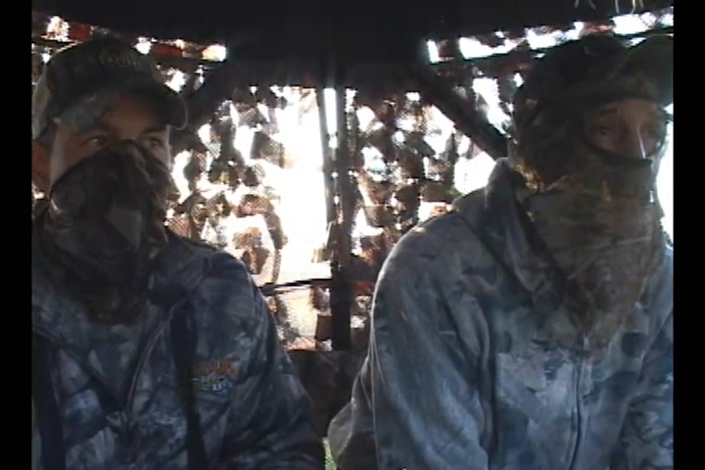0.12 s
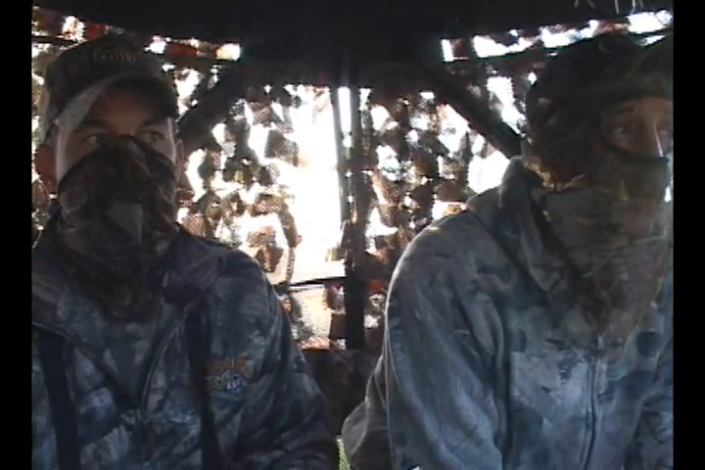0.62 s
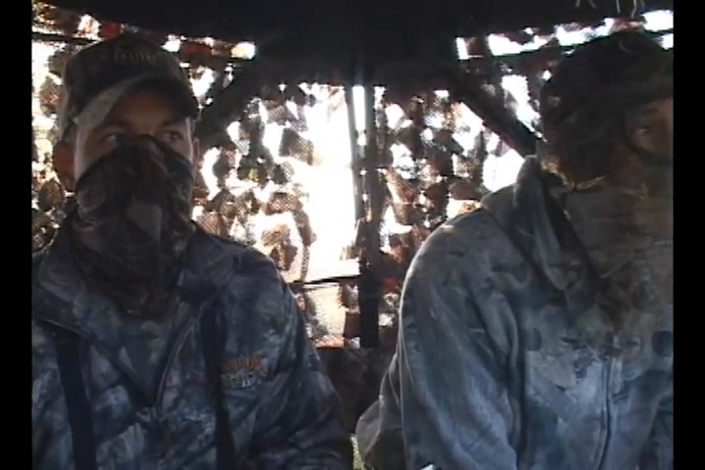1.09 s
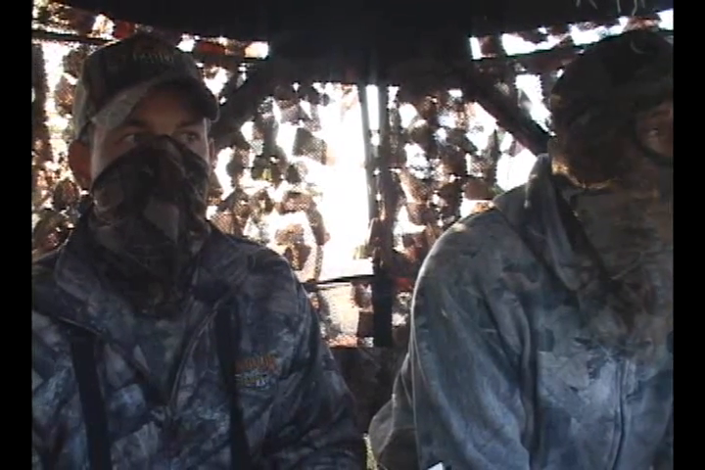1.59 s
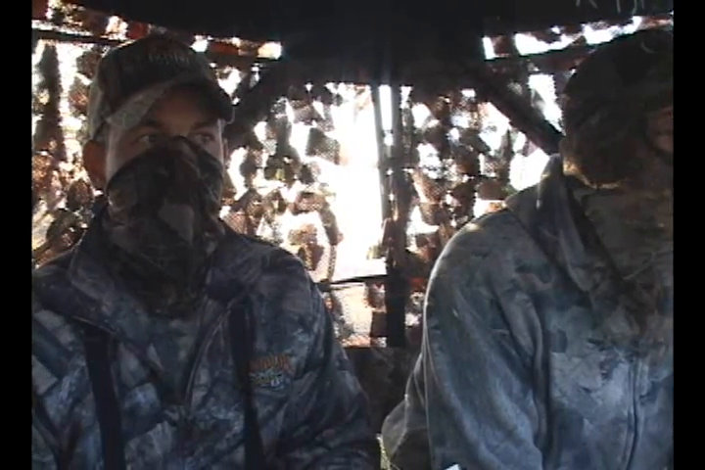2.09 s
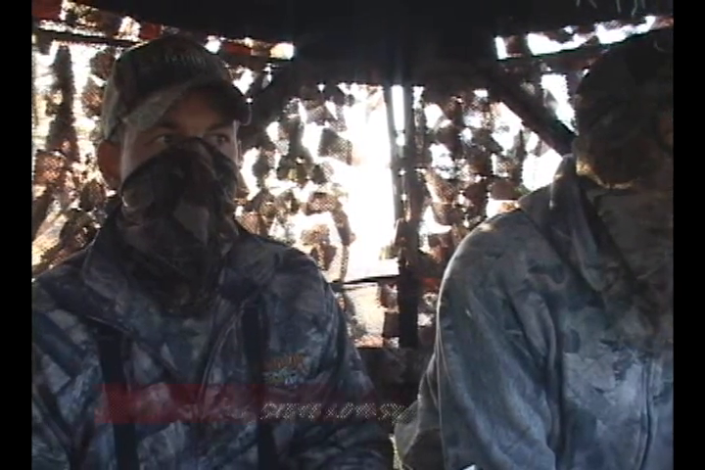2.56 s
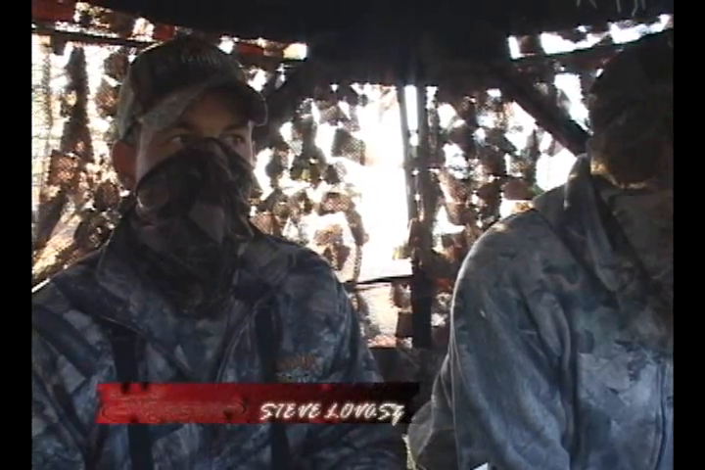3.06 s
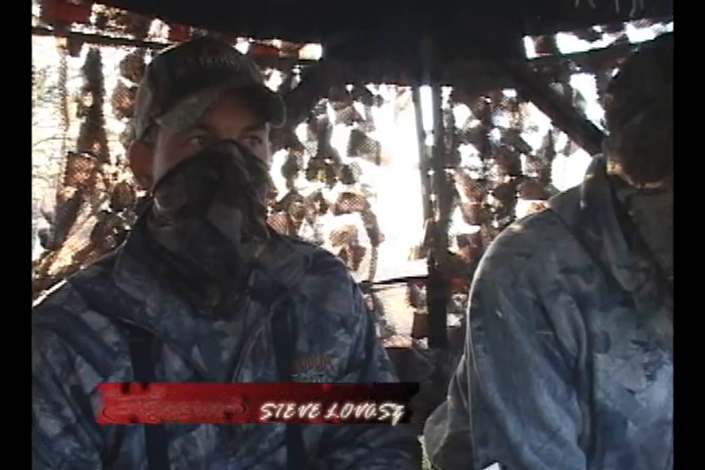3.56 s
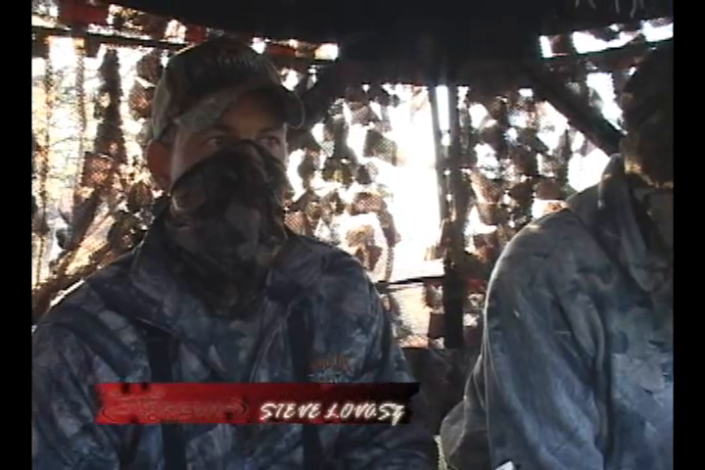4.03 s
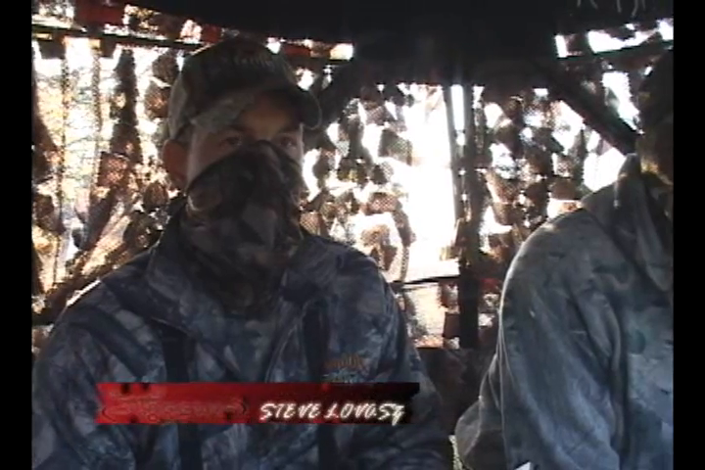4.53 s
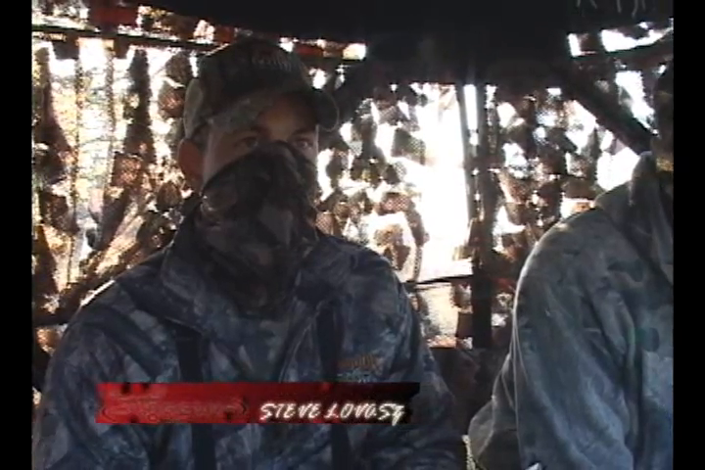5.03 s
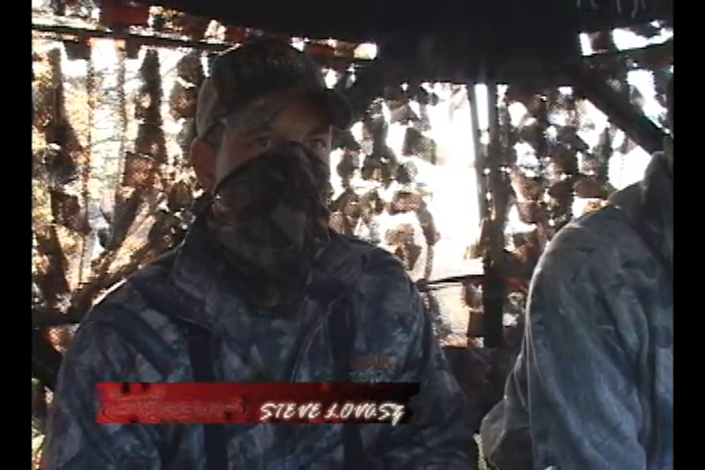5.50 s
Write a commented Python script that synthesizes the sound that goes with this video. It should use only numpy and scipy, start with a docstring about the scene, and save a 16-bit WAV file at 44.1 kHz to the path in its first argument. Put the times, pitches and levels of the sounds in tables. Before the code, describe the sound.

Low wind rumble and soft hiss open the scene, heard by a close microphone in a small, nearly echo-free cloth hide. At 0.1 seconds a wooden box call gives a loud, raspy, nasal yelp about 0.15 seconds long; the second comes at 0.56, and nine more follow roughly every 0.4 seconds, ending at 4.3. Each yelp bites quickly, sags in pitch, then flicks upward as it stops, with a faint gritty squeak. Between strokes the chalked lid slides back with a light, rounded scrape, and dull low thumps come from hand jolts. The eighth yelp drops out for an instant near 3.05. Small birds whistle faintly at 1.3 and between 2.1 and 2.6. From 4.3 held high notes, sliding whistles and faint pips emerge, then a rapid run of short chirps from 5.0. A tiny dry tick comes near 5.08, and a high buzzing trill begins around 5.5.

```python
"""A wooden box call is stroked eleven times in a small hide: its chalked lid sticks and slips on the rim.
Each slip is a pulse that rings the box as a yelp; the lid settles with a squeak, and between strokes
it drags back as filtered noise. Low sine thumps are the hand jolting the microphone.
Songbirds are sliding whistles and a trill, over wind rumble and hiss made of coloured noise; a tick clicks.
The sound drops out for an instant in the eighth yelp."""
import sys
import numpy as np
from scipy import signal
from scipy.io import wavfile
from scipy.ndimage import uniform_filter1d

SR = 44100
rng = np.random.default_rng(int(sys.argv[2]) if len(sys.argv) > 2 else 0)


def volts_from_decibels(level):
    """Turn decibel levels (scalar or array-like) into linear amplitude factors."""
    exponent = np.asarray(level, float) / 20
    return 10 ** exponent


def persist_wave(psi):
    """Save psi, clipped to +-1, as 16-bit WAV."""
    counts = np.round(np.clip(psi, -1, 1) * 32767).astype(np.int16)
    wavfile.write(sys.argv[1], SR, np.atleast_2d(counts).T)


N = 248283  # length in samples


def evened(x):
    """Scales a sound to an rms (average strength) of 1."""
    return x / np.sqrt(np.mean(x ** 2) + 1e-20)


def read(points, hz):
    """Reads a spectrum table on a log-frequency axis, close to how we hear pitch."""
    f, value = np.transpose(points)
    return np.interp(np.log(hz + 1), np.log(f + 1), value)


def add(mix, start, sound):
    """Mixes a sound in at start seconds."""
    part = mix[round(start * SR):][:len(sound)]
    part += sound[:len(part)]


def wander(size, span):
    """Smooth random drift of rms 1: noise averaged twice over span samples."""
    once = uniform_filter1d(rng.standard_normal(size), round(span))
    return evened(uniform_filter1d(once, round(span)))


def coloured(points, patchy_db):
    """Noise with a given spectrum, whose strength drifts in patches of time and pitch."""
    frames, hz = N // 512 + 5, np.fft.rfftfreq(2048, 1 / SR)
    real, imaginary, patches = rng.standard_normal((frames, 1025, 3)).T
    patches = evened(uniform_filter1d(uniform_filter1d(patches, 8, 0), 5, 1))
    level_db = read(points, hz)[:, None] + patchy_db * patches
    spectrum = (real + 1j * imaginary) * volts_from_decibels(level_db)
    return evened(signal.istft(spectrum, nperseg=2048, noverlap=1536)[1][:N])


# colour of the air hiss: f/Hz, relative level/dB
AIR = [(150, -39.5), (250, -7.5), (330, -10), (354, -12), (500, -6), (1420, -16), (2340, -27),
       (2510, -22.5), (4380, -27.5), (5390, -34), (15800, -38.5)]
# colour of the wind rumble: f/Hz, relative level/dB
RUMBLE = [(12, -62.5), (20, -29), (50, 0), (75, -5), (109, -2), (134, -10), (239, -17), (400, -32.5),
          (520, -60.5), (880, -120)]
# swell of the rumble: t/s, level/dB
GUSTS = [(0.0, -43), (1.6, -46), (1.68, -40.5), (1.83, -51.5), (2.13, -45.5), (2.6, -48), (4.86, -51.5),
         (5.38, -47.5), (5.63, -54)]
# thin wavering whistles in the hiss: f/Hz, width/Hz, level/dB
FAINT_TONES = [(1497, 40, -79), (6444, 20, -91), (8689, 20, -92)]


def outdoors():
    """Lumpy wind rumble over a smoother hiss, with a few faint tones that waver in strength."""
    t = np.arange(N) / SR
    tones = np.zeros(N)
    for hz, width, db in FAINT_TONES:
        waver = 0.92 + .6 * wander(N, SR / width / 2)
        tones += volts_from_decibels(db) * waver * np.sqrt(2) * np.sin(2 * np.pi * hz * t)
    gust_db = np.interp(t, *np.transpose(GUSTS))
    rumble = volts_from_decibels(gust_db) * coloured(RUMBLE, patchy_db=2.0)
    hiss = volts_from_decibels(-57) * coloured(AIR, patchy_db=1.0)
    return rumble + hiss + tones


# broad colour of the box: f/Hz, relative level/dB
BOX = [(300, -52), (700, -21.5), (1000, -16), (1500, -4.5), (2200, -16), (3200, -20.5), (4600, -33.5),
       (7400, -32.5), (10400, -43.5), (15500, -54)]
# its resonances and dead spots: f/Hz, width/Hz, level above the broad colour/dB
BOX_MODES = [(1341.4, 166, 10), (1662, 21, 1), (1678, 320, 11), (2225, 170, 8), (2420, 150, -0.5),
             (2678, 266, 9.5), (2770, 56, -12.5), (2900, 270, 5), (3400, 63, 10.5), (3584, 200, -9),
             (3853, 403, 22), (4106, 170, 7), (4486, 323, -8.5), (4620, 496, 10.5), (5480, 140, 13.5),
             (6000, 250, 7.5), (6367, 344, 12), (6900, 300, -2.5), (7670, 100, 2.5), (8530, 410, 6.5),
             (9110, 330, 8), (11800, 500, 2.5), (11380, 230, 5)]


def box_ring(extra=((1, 0), (2, 0)), depth=1):
    """How the box rings after one tap: broad colour times resonances, with no sound before the tap."""
    hz = abs(np.fft.fftfreq(8192, 1 / SR))
    modes_db = sum(d / (1 + (2 * (hz - f) / w) ** 2) for f, w, d in BOX_MODES)
    db = read(BOX, hz) + read(extra, hz) + depth * modes_db
    # the Hilbert transform gives the minimum phase that belongs to these levels
    spectrum = np.exp(np.conj(signal.hilbert(np.log(volts_from_decibels(db)))))
    return np.fft.ifft(spectrum).real[:2048]


def stroke(start, end, bite_ms, lift_db, chalk_db, rates):
    """Hand motion of one stroke, as rows of t/s, level/dB, slips f/Hz, sharpness/dB, grit/dB."""
    s = np.linspace(start, end, 80)
    since, left, bite = s - start, end - s, bite_ms / 1000
    # loudness climbs from far below until the lid bites, then pressure eases for a moment
    loud_db = -16.5 - 29.5 * np.clip(1 - since / bite, 0, 1) ** 2
    loud_db -= np.exp(-((since - bite - .008) / 0.012) ** 2)
    # it drops as the lid lifts, and dies off at the very end
    loud_db -= 14 * np.clip(1 - left / 0.023, 0, 1) ** 1.35
    loud_db -= 11.5 * np.exp(-left / 0.0029)
    # a last upward flick of speed as the lid lets go
    hz = np.interp(s, *np.transpose(rates)) + 120 * np.exp(-left / .005)
    # slips start dull and sharpen as pressure builds
    sharp_db = lift_db - 18 * np.exp(-since / 0.024)
    # grit takes over as the lid lifts; a lid slower than 666 slips a second stumbles and grates
    rasp_top_db = -3
    grit_db = chalk_db + (rasp_top_db - chalk_db) * np.exp(-left / .016)
    grit_db += 0.33 * np.maximum(666 - hz, 0)
    return np.transpose([s, loud_db, hz, sharp_db, grit_db])


# extra colour of the chalk grit: f/Hz, level/dB
CHALK = [(500, 0), (1400, -10), (3000, 0), (6000, 10), (12000, 18)]


def yelp(rows):
    """Stick-slip pulses ring the box; grit adds a puff of noise to each slip and makes its timing uneven."""
    ring, chalk = box_ring(), box_ring(CHALK)
    s, loud_db, *columns = np.transpose(rows)
    t = np.arange(s[0], s[-1], 1 / SR)
    hz, sharp_db, grit_db = (uniform_filter1d(np.interp(t, s, c), 100, mode="nearest") for c in columns)
    uneven = np.minimum(.004 + .1 * volts_from_decibels(grit_db), .018)
    turns = np.cumsum(hz * (1 + uneven * wander(len(t), 30))) / SR  # slips counted so far
    slips = np.zeros(len(t))
    for k in range(1, 27):  # overtones of the slip rate
        treble = np.clip((k * hz - 1750) / 1800, 0, 1) + 0.56 * np.clip((k * hz - 8500) / 5000, 0, 1)
        treble += 0.35 * (k == 1)  # dull slips also lack the lowest tone
        # the contact point moves, so overtones come and go
        shape_db = treble * sharp_db + (1.47 + 2.5 * treble) * wander(len(t), 500)
        # high overtones leave from different parts of the box, out of step
        lag = rng.random() * min(k / 8, 1)
        slips += volts_from_decibels(shape_db) * np.cos(2 * np.pi * (k * turns + lag)) * (k * hz < 16500)
    puffs = .3 + np.exp(-(turns % 1) / .3)
    grit = puffs * rng.standard_normal(len(t)) * volts_from_decibels(grit_db + 3 + .5 * sharp_db)
    sound = evened(signal.fftconvolve(slips, ring)[:len(t)])
    sound += signal.fftconvolve(grit, chalk)[:len(t)] / np.linalg.norm(chalk)
    # strength is evened out, then follows the loudness rows, not the resonances
    steady = sound / np.sqrt(uniform_filter1d(sound ** 2, 400, mode="mirror") + 1e-9)
    return steady * np.interp(t, s, volts_from_decibels(loud_db)) * signal.windows.tukey(len(t), .03)


# one row a stroke: start t/s, end t/s, time to bite/ms, treble lift of sharp slips/dB, chalk grit/dB
STROKES = [(0.116, 0.259, 4.1, 5, -32), (0.564, 0.718, 5.2, 6, -21), (0.985, 1.142, 5.8, 7, -27),
           (1.37, 1.534, 17, 7.5, -24), (1.782, 1.938, 18.6, 8, -26.5), (2.183, 2.33, 5.2, 9, -32.5),
           (2.588, 2.736, 4.5, 9.5, -30), (2.976, 3.14, 12, 8, -29), (3.382, 3.531, 4.7, 9.5, -32),
           (3.762, 3.917, 8, 9, -34.5), (4.147, 4.305, 12.7, 8.5, -31)]
# speed of the lid before its last flick, one list a stroke: t/s, slips f/Hz
SLIP_RATES = [
    [(0.116, 860), (0.13, 762), (0.145, 701.6), (0.208, 685.2), (0.236, 705), (0.25, 753), (0.262, 970)],
    [(0.566, 849), (0.586, 714.6), (0.658, 671.7), (0.676, 642), (0.69, 655), (0.698, 734), (0.718, 897)],
    [(0.988, 863), (1.0, 839), (1.03, 719), (1.086, 689), (1.106, 629), (1.118, 680), (1.14, 912)],
    [(1.374, 736), (1.392, 789), (1.422, 759), (1.44, 711.7), (1.476, 694.5), (1.496, 620.3), (1.506, 656),
     (1.532, 967)],
    [(1.79, 715), (1.802, 764.7), (1.82, 760.4), (1.858, 706.4), (1.9, 683.4), (1.916, 726), (1.932, 980)],
    [(2.184, 841), (2.198, 838), (2.24, 726.4), (2.294, 681), (2.31, 730), (2.328, 967)],
    [(2.588, 884), (2.612, 824.5), (2.648, 741.6), (2.676, 707.4), (2.694, 701), (2.712, 726), (2.732, 964)],
    [(2.979, 797), (3.001, 841.7), (3.037, 809), (3.089, 698.5), (3.105, 675), (3.121, 736), (3.135, 958)],
    [(3.382, 877), (3.398, 824), (3.424, 758), (3.434, 764), (3.45, 723.6), (3.494, 683.7), (3.51, 723),
     (3.528, 976)],
    [(3.763, 848), (3.781, 849), (3.805, 774), (3.821, 767), (3.833, 730), (3.883, 693), (3.895, 727),
     (3.913, 993)],
    [(4.15, 806), (4.168, 869), (4.174, 805), (4.202, 761), (4.238, 706.4), (4.268, 700), (4.282, 722),
     (4.304, 964)],
]


def yelps():
    """The lid is stroked across the rim, once for each row of the table."""
    out = np.zeros(N)
    for row, rates in zip(STROKES, SLIP_RATES):
        controls = stroke(*row, rates)
        add(out, controls[0, 0], yelp(controls))
    return out


def hide(x):
    """Cloth walls give only a very short, weak diffuse tail: sparse, fading random echoes."""
    t = np.arange(SR // 4) / SR
    echoes = rng.standard_normal(len(t)) * (rng.random(len(t)) < .05)
    tail = echoes * volts_from_decibels(-60 * t / 0.18) * (t > .002)  # falls 60 dB in 0.18 s
    return x + signal.fftconvolve(x, volts_from_decibels(-20) * tail / np.linalg.norm(tail))[:N]


# the hand jolts the microphone during or just after a stroke: t/s, level before the swell and decay/dB
JOLTS = [(0.199, -25), (0.589, -35.5), (0.719, -31.5), (0.999, -23.5), (1.139, -32.5), (1.399, -45.5),
         (1.529, -26.5), (1.809, -29.5), (1.939, -30.5), (2.199, -38), (2.599, -35), (2.999, -36.5),
         (3.399, -31.5), (3.779, -39.5), (4.159, -38)]


def jolts():
    """Soft low thumps: a 30 Hz sine that swells and dies away."""
    out, t = np.zeros(N), np.arange(SR // 10) / SR
    thump = np.sin(2 * np.pi * 30 * t) * np.exp(-t / 0.031) * np.minimum(t / 0.024, 1)
    for s, db in JOLTS:
        add(out, s, volts_from_decibels(db) * thump)
    return out


# the lid settling, timed from the end of each stroke: t/s, level/dB, slips f/Hz, sharpness/dB, grit/dB
SETTLE = [(-.004, -36, 700, 5, 0), (.006, -45, 705, 8, -4), (.018, -41, 722, 14, -20),
          (.028, -44, 750, 14, -20), (.036, -62, 780, 6, -10)]


def settling():
    """The lid settles after every stroke with a faint gritty squeak, by the same stick and slip."""
    out = np.zeros(N)
    for _, end, *_ in STROKES:
        rows = [(end + s, *rest) for s, *rest in SETTLE]
        add(out, rows[0][0], yelp(rows))
    return out


# the lid sliding back between strokes: start t/s, end t/s, loudest t/s, level/dB
DRAGS = [(0.3, 0.579, 0.38, -47), (0.753, 0.956, 0.83, -40.5), (1.174, 1.335, 1.25, -38),
         (1.57, 1.766, 1.645, -37.5), (1.973, 2.155, 2.06, -38.5), (2.368, 2.549, 2.46, -39),
         (2.777, 2.953, 2.88, -38.5), (3.177, 3.355, 3.29, -40.5), (3.566, 3.755, 3.642, -41.5),
         (3.957, 4.146, 4.035, -40)]
# extra colour of this light return scrape: f/Hz, level/dB
SCRAPE = [(500, -5.5), (1000, 4.5), (1400, -5.5), (2300, 2), (3800, -0.5), (5400, 10), (5950, 5),
          (6400, 9.5), (12000, 8.5)]


def drags():
    """Light, patchy chalk friction through the same box, in rounded swells softer at both ends."""
    friction, pressure = coloured([(1, 0), (2, 0)], patchy_db=4), np.zeros(N)
    for start, end, top, db in DRAGS:
        t = np.arange(start, end, 1 / SR)
        rise = np.clip((top - t) / (top - start), 0, 1)
        fall = np.clip((t - top) / (end - top), 0, 1)
        swell_db = -9.5 * rise ** 1.8 - 17.5 * fall ** 1.8
        add(pressure, start, volts_from_decibels(db + swell_db) * signal.windows.tukey(len(t), .15))
    rough = friction * volts_from_decibels(wander(N, 120))
    return pressure * evened(signal.fftconvolve(rough, box_ring(SCRAPE, depth=0.78))[:N])


def whistle(shape, db):
    """A bird's near-pure tone: a sine sliding along a shape in pitch and level."""
    s, hz, level_db = np.transpose(shape)
    t = np.arange(0, s[-1], 1 / SR)
    tone = np.sin(2 * np.pi * np.cumsum(np.interp(t, s, hz)) / SR)
    return np.sqrt(2) * tone * volts_from_decibels(db + np.interp(t, s, level_db)) * signal.windows.tukey(len(t), .1)


def run_of(first, spacing, notes, db):
    """Evenly spaced notes of slightly different strength."""
    return [(first + spacing * k, db + 1.8 * rng.standard_normal()) for k in range(notes)]


# shapes of the bird notes, from each note's start: t/s, f/Hz, level/dB
RISE = [(0, 4230, -10.5), (.015, 4970, -1), (.03, 5600, -2), (.036, 5750, -2)]
SLIDE_IN = [(0, 4040, -9), (.016, 3400, 2.5), (0.039, 2974, 2), (.083, 3030, 4), (.088, 3000, -16)]
DROOP = [(0, 3000, -4), (.008, 2800, -4), (.025, 2400, -2), (.055, 2250, -1)]  # a sagging note
FALL = [(0, 3350, -12), (.01, 3250, -3.5), (0.041, 2900, 2), (.05, 2800, -6.5)]
HELD = [(0, 4390, -11), (.012, 4307, 0.5), (.06, 4305, -0.5), (.09, 3450, -10), (.097, 3290, -21)]
SLIDE_OUT = [(0, 3110, 0), (.012, 2480, 7.5), (0.021, 2050, 6.5), (.04, 1630, -17)]
PIP = [(0, 2310, -9), (.01, 2280, 4.5), (.035, 2290, 2), (0.046, 2300, -8)]  # a short level note
SHORT = [(0, 3890, -13.5), (.008, 3650, 0), (.016, 3350, -5), (0.021, 3240, -16)]
HOOK = [(0, 7480, -12), (.01, 7450, -5.5), (.02, 6900, 2), (.03, 6000, -12)]
THREAD = [(0, 3450, -8), (.03, 3340, 0), (.08, 3330, -3), (.12, 3300, 0)]  # a thin held note under the last run
# when each is sung: t/s, level added to the shape/dB
RISE_AT = [(1.338, -64), (5.368, -75), (5.436, -70), (5.474, -67)]
SLIDE_IN_AT = [(2.135, -56), (4.467, -61.5), (4.502, -55)]
DROOP_AT = [(2.352, -43.5)]
FALL_AT = [(2.536, -52), (2.565, -49)]
HELD_AT = [(4.34, -66), (4.478, -64), (4.616, -64.5), (4.748, -64.5), (4.879, -68)]
SLIDE_OUT_AT = [(4.555, -59), (4.585, -53), (4.598, -62), (4.607, -60)]
HOOK_AT = [(5.36, -67), (5.394, -72)]
THREAD_AT = [(5.51, -73)]
# even runs of notes: first t/s, spacing/s, number of notes, level added to the shape/dB
PIP_RUN = (4.7, .069, 10, -75)
SHORT_RUN = (5.003, .0396, 16, -66.5)


def birds():
    """Songbirds: held notes ending in a run, sliding phrases and faint pips, all as whistles."""
    out = np.zeros(N)
    songs = [(RISE, RISE_AT), (SLIDE_IN, SLIDE_IN_AT), (DROOP, DROOP_AT), (FALL, FALL_AT),
             (HELD, HELD_AT), (SLIDE_OUT, SLIDE_OUT_AT), (PIP, run_of(*PIP_RUN)),
             (SHORT, run_of(*SHORT_RUN)), (HOOK, HOOK_AT), (THREAD, THREAD_AT)]
    for shape, notes in songs:
        for s, db in notes:
            add(out, s, whistle(shape, db))
    return out


# a small dry tick: t/s, level/dB
TICKS = [(5.0764, -43)]


def ticks():
    """A tiny burst of noise with a brief 2290 Hz ring."""
    out, t = np.zeros(N), np.arange(SR // 10) / SR
    for s, db in TICKS:
        click = .5 * rng.standard_normal(len(t)) * np.exp(-t / 0.00089)
        ring = .5 * np.sin(2 * np.pi * 2290 * t) * np.exp(-t / 0.0017)
        add(out, s, volts_from_decibels(db) * (click + ring))
    return out


# the trill and its echo: start t/s, centre f/Hz, first swing/Hz, warble rate f/Hz, level/dB
TRILLS = [(5.471, 5900, 600, 91, -66), (5.507, 6040, 600, 98, -68)]


def trills():
    """A high bird trill: a sine whose pitch warbles less and less while its centre creeps up."""
    out = np.zeros(N)
    for start, hz, swing_hz, rate, db in TRILLS:
        t = np.arange(N - round(start * SR)) / SR
        warble = signal.sawtooth(2 * np.pi * rate * t, .25)  # quick rise, slower fall
        pitch = hz - 300 * np.exp(-t / .04) + swing_hz * np.exp(-t / 0.17) * warble
        level_db = db - 3.1 * warble + 2.5 * wander(len(t), 200)  # fainter when higher
        add(out, start, volts_from_decibels(level_db) * np.sin(2 * np.pi * np.cumsum(pitch) / SR))
    return out


def scene():
    """The call in the hide and the world outside, heard through one microphone on two equal channels."""
    call = yelps() + settling() + drags()
    mono = hide(call + birds() + trills()) + outdoors() + jolts() + ticks()
    return np.tile(mono, (2, 1))


def band_limit(x):
    """A steep low-pass at the top of the band."""
    return signal.sosfilt(signal.butter(12, 16480, fs=SR, output="sos"), x)


# the dropout, one row: sound breaks t/s, silence t/s, sound returns t/s
DROPOUT = (3.0481, 3.0635, 3.0811)


def record(dry):
    """The signal breaks off, leaves a faint trace, falls silent and snaps back."""
    t = np.arange(N) / SR
    breaks, silent, returns = DROPOUT
    trace = np.where(t < silent, volts_from_decibels(-32.5), 0)
    gate = np.where((t > breaks) & (t < returns), trace, 1)
    return band_limit(dry * gate)


dry = scene()
out = record(dry)
persist_wave(out)
```